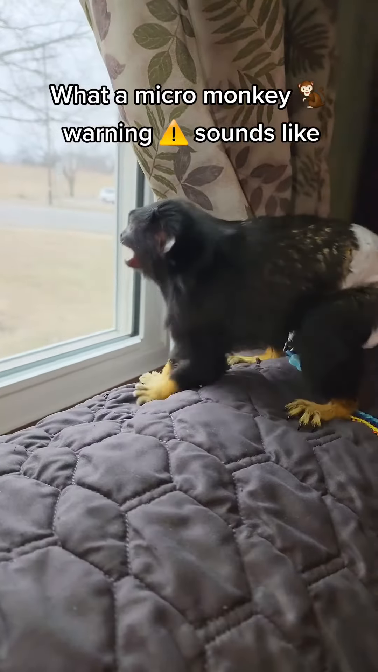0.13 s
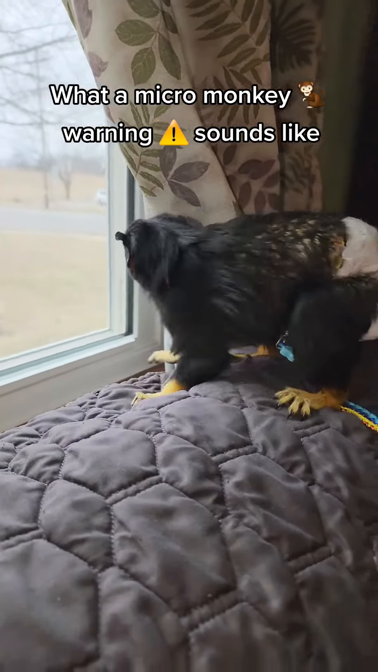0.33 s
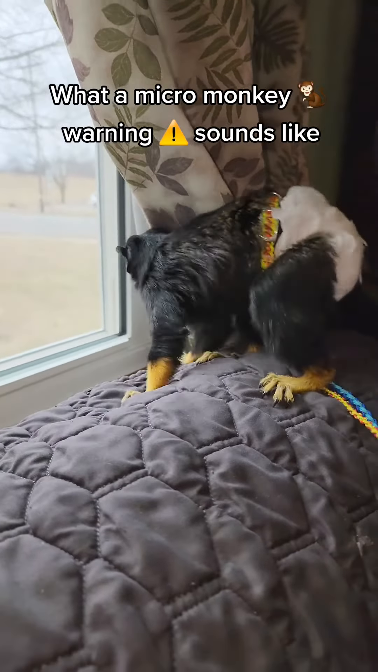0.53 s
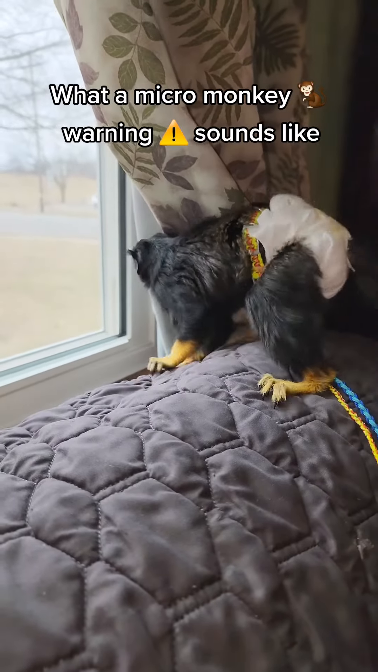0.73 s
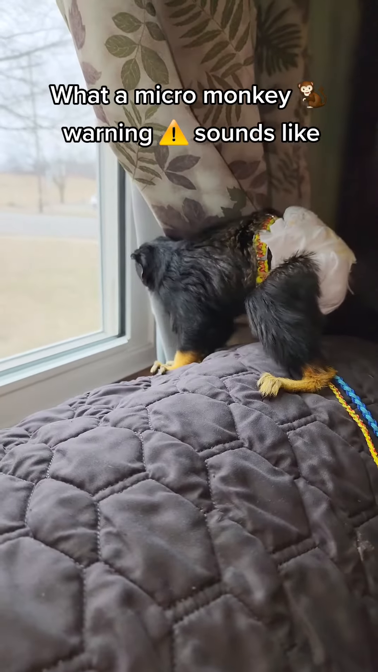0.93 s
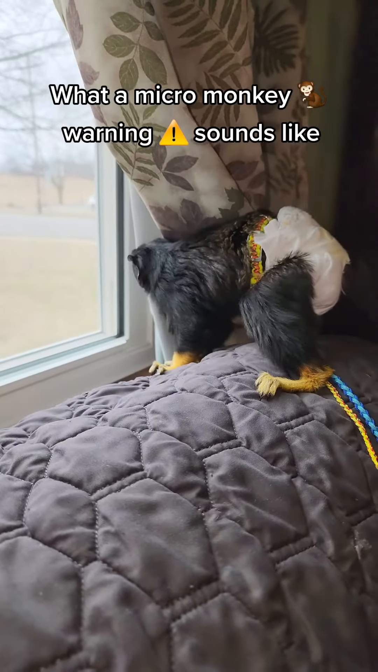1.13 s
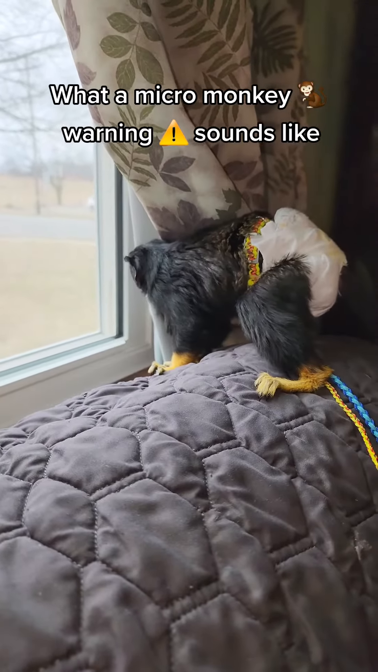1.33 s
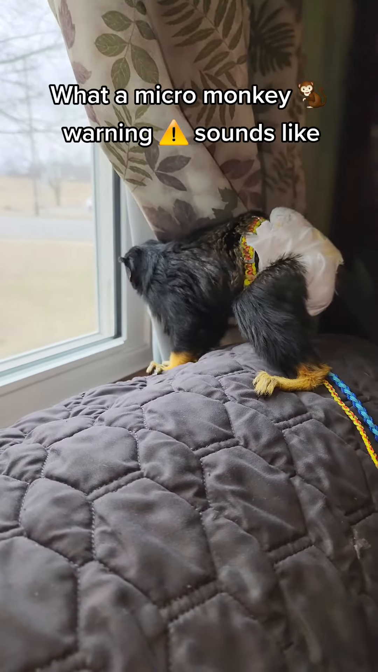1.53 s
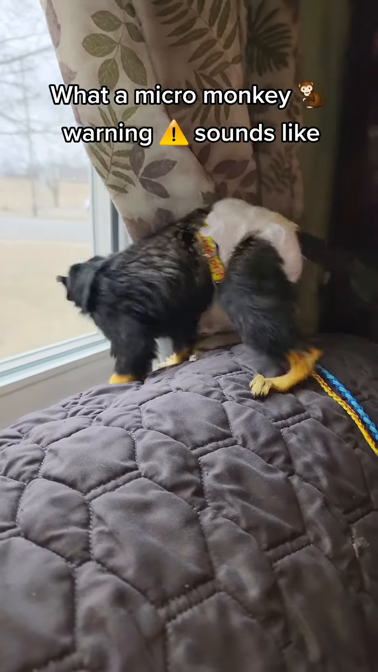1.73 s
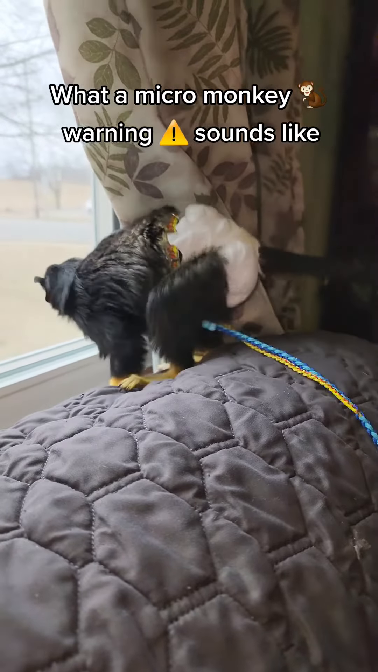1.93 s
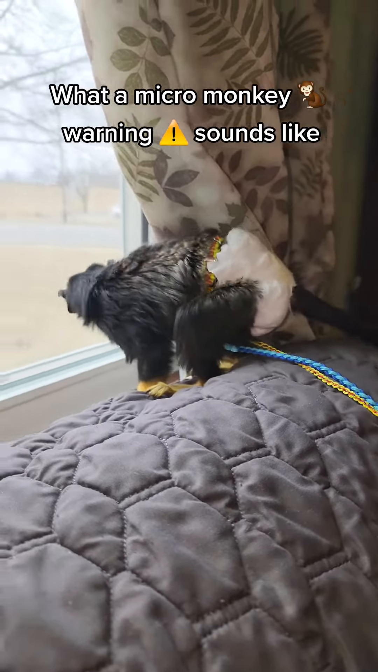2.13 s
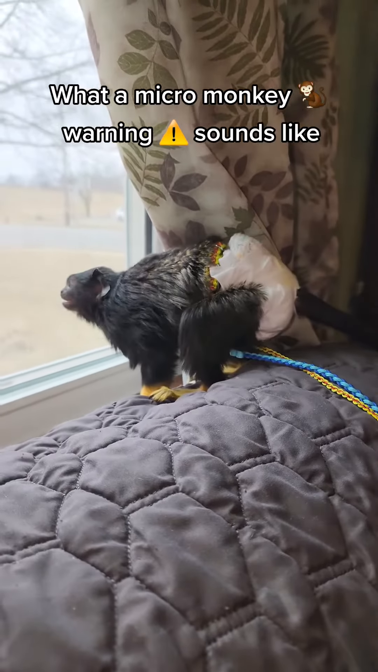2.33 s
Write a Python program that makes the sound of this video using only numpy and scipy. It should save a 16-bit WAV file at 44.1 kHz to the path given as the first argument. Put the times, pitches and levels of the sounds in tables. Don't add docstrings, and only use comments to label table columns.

```python
import sys
import numpy as np
from scipy import signal
from scipy.fft import rfft, irfft, next_fast_len
from scipy.io import wavfile
from scipy.ndimage import uniform_filter1d, minimum_filter1d, map_coordinates

SR = 44100
rng = np.random.default_rng(int(sys.argv[2]) if len(sys.argv) > 2 else 0)


def nominal_scale(level):
    x = np.asarray(level, float) / 20
    return 10 ** x


def int16_out(signal):
    q = np.round(np.clip(np.atleast_2d(signal).T, -1, 1) * 32767)
    wavfile.write(sys.argv[1], SR, q.astype(np.int16))


N = 110250
SHORT, LONG, PAD = SR // 20, SR // 5, SR // 8

# (frequency [Hz], level [dB per Hz])
AIR_COLOUR = [(88, -29), (150, 0.5), (300, -14.5), (500, -18), (700, -17), (1600, -25.5), (5000, -38.5),
              (9500, -50), (15700, -49)]
# (frequency [Hz], width [Hz], level [dB])
HUM_PEAKS = [(36.2, 14, 0), (66.6, 17, 1), (86.1, 21, -3), (121.6, 14, -4), (190, 13, -16.5),
             (283, 15, -14.5)]
# (frequency [Hz], correlation [-1 to 1])
PORT_LIKENESS = [(60, 1), (180, 0.94), (550, 0.28), (1650, -0.53), (4970, -0.12), (15000, -0.14)]
# (frequency [Hz], level [dB])
LEFT_LEAN = [(60, 0), (180, 1.5), (550, 2.5), (1650, 4.5), (4970, 2), (15000, 3)]
# (delay [s], left level [dB], right level [dB])
NEAR_WALLS = [(.0011, -13.5, -13), (.0068, -10.5, -12), (.0125, -20, -24), (.021, -28, -24.5),
              (.029, -18, -19)]
# (frequency [Hz], t60 [s])
ROOM_DECAY = [(300, .3), (2000, 0.23), (4000, 0.26), (8000, .225), (12000, 0.24), (16000, .11)]
# (time [s], peak level [dB], ring [Hz], t60 [s])
CLAW_TICKS = [(.0835, -44, 1950, 0.0098), (0.0838, -42, 4903, 0.018), (.8075, -63, 4800, .03),
              (.809, -61, 6100, 0.025), (.8315, -50.5, 6100, .015), (.8325, -62, 14800, 0.0071),
              (.786, -63, 1000, .08), (.945, -61, 3200, 0.036), (.168, -56, 7600, 0.026),
              (.995, -52, 517, 0.024), (1.015, -62, 9000, 0.0074), (1.055, -54, 1225, .04),
              (2.268, -44, 3770, 0.02), (2.268, -51, 8600, 0.0083), (2.268, -59, 13040, .006),
              (2.268, -45.5, 423, 0.047), (2.272, -47, 190, .07)]
SCUFF_TIMES = [.092, .184, .26, .62, .775, .805, .815, .87, .88, .9, 1.735, 1.8, 1.97, 2.14, 2.267, 2.268,
               2.275, 2.43, .83, .76, 1.012, 2.268, .128, .21, .106, .235, 1.937, 2.003]
# (length [s], peak level [dB], centre [Hz], width [octaves])
SCUFF_SOUNDS = [(.09, -75, 5600, 0.47), (0.016, -53, 6000, 0.92), (0.1, -73.5, 1192, 1.6),
                (0.263, -85, 1600, 3.4), (0.14, -71, 880, 0.52), (0.17, -78.5, 3200, 1.25),
                (0.071, -73.5, 2870, 0.13), (0.025, -69, 1400, 1.16), (0.24, -73, 460, 1.06),
                (0.18, -76.5, 1800, 1.6), (0.1237, -80.5, 12500, 0.23), (0.25, -74, 290, 1.47),
                (0.19, -75.5, 760, 1.8), (0.099, -75, 9830, 1.05), (0.085, -58, 240, 0.81),
                (0.07, -75, 2770, 0.78), (0.059, -73.5, 1510, 0.15), (0.042, -71, 510, 0.85),
                (.065, -72.5, 9500, 0.58), (.2, -78.5, 11000, 1.1), (0.0097, -73.5, 11000, 0.65),
                (0.013, -66.5, 1700, 1.5), (.025, -69.5, 6500, .45), (.016, -53, 7900, .12),
                (0.012, -60.5, 5400, .38), (0.1009, -66.5, 15000, .12), (0.049, -70, 12600, .1),
                (.1, -70.5, 13000, .2)]
# (time [s], length [s], start pitch [Hz], end pitch [Hz], peak level [dB])
CHIRP_NOTES = [(0.1073, .006, 5680, 4820, -32.5), (0.2248, 0.0082, 3614, 4010, -11),
               (0.2303, 0.01, 3976, 4763, -4.5), (0.2966, .0098, 3720, 3939, -8),
               (0.83, 0.015, 3000, 2640, -68), (1.027, 0.027, 2256, 2353, -44),
               (1.8767, 0.0039, 4926, 4380, -25), (1.935, .0105, 3800, 4527, -10.5),
               (2.001, 0.009, 3403, 3833, -12.5), (0.096, .017, 5000, 5170, -55.5),
               (0.223, 0.0041, 3347, 3755, -19)]
# (second [dB], third [dB], higher overtones [dB], left over right [dB], left port ahead [ms])
CHIRP_TIMBRES = [(-31, -48, -55, 6.5, 0.16), (3.5, -14.5, -54.5, 5, .135), (-10.5, -28.5, -58.5, -1, 0.15),
                 (-7, -20, -39.5, 10, .14), (5, 11, 3, 15, 0.14), (-18.5, -24, -30, 4.5, 0.14),
                 (-14.5, -38, -45, 6.5, 0.17), (-7, -38, -48.5, 8, 0.11), (-4.5, -31.5, -30, 8.5, 0.097),
                 (-30.5, -45, -55, 5.5, 0.12), (3, -21, -38.5, 3, .14)]
# (breath under whistle [dB], echoes [dB], glide power [exponent],
# fifth overtone over fourth [dB], share of the overtones' earliness [ratio])
CHIRP_AIMS = [(-30.5, 4, 1.1, -4, .4), (-41, -5, 1.4, -4, -0.017), (-41, -2.5, 1.1, -4, 1),
              (-43.5, -11, 0.45, -4, 1), (-5, -2, 0.37, 10, .7), (-45, -10, 1.2, -12, -0.53),
              (-27.5, 7, 1.4, -4, 0.7), (-38.5, -3, .8, -4, .9), (-37.5, -2.5, 0.41, -4, 0.83),
              (-13.5, -5, 1.3, -4, .3), (-37.5, -3.5, 0.55, -3.5, -.3)]
PARTIAL_SHIMMER = [.04, .07, .45, .3, .3]
# (frequency [Hz], gain [dB])
MOUTH_COLOUR = [(1000, 3), (3600, -2.5), (4500, -2), (7600, 0.75), (9000, 1.5), (12000, 0.08),
                (13300, -14.5), (15300, -9)]
# (frequency [Hz], level [dB])
BREATH_COLOUR = [(300, -30), (1500, -20.5), (3500, 1), (6000, 0.6), (8800, -2), (10400, -20), (13100, -11),
                 (16000, -18)]
# (frequency [Hz], gain [dB])
RIGHT_PORT_GAIN = [(2000, 4.17), (3700, -2), (4400, 2), (5200, -1.7), (7500, 4), (8500, -2), (11500, 3),
                   (15000, -2)]
# (frequency [Hz], turn [radians])
RIGHT_PORT_PHASE = [(3700, .05), (4400, .05), (7500, 0.046), (8500, .05), (11500, 0.24), (15000, 0.6033)]
# (time [s], length [s], peak level [dB], brightness [dB per octave])
SNIFF_PUFFS = [
    (0.434, 0.036, -69.5, 1),
    (0.528, 0.0244, -69, 2.5),
    (0.608, 0.024, -74.5, 1),
    (0.8, 0.015, -71, -7),
    (1.747, 0.042, -61.5, -2.5),
    (1.816, 0.055, -63.5, 5.5),
    (2.152, 0.021, -71.5, -2.5),
    (0.166, .016, -70.5, 4.5),
]
# (frequency [Hz], width [Hz], level [dB])
NOSE_PEAKS = [(2010, 350, -2), (3660, 816, -3), (4980, 600, 1.55), (7550, 1200, -4), (12514, 4000, -12)]
# (frequency [Hz], gain [dB])
PORT_COLOUR = [(100, 2.5), (8800, 3), (10100, -9), (11200, -4), (15500, -3)]


def unit(x):
    return x / np.sqrt(np.mean(x ** 2) + 1e-20)


def along(points, hz):
    f, v = np.transpose(points)
    return np.interp(np.log(hz + 1), np.log(f + 1), v)


def wobble(rate, size):
    knots = rng.standard_normal(size // 40)
    return map_coordinates(knots, [np.arange(size) * rate / SR])


def filtered(x, response):
    m = next_fast_len(x.shape[-1] + PAD)
    spectrum = rfft(x, m) * response(np.fft.rfftfreq(m, 1 / SR))
    return irfft(spectrum, m)[..., :x.shape[-1]]


def peaks(table, f):
    total = 0
    for k, (centre, width, db) in enumerate(table):
        resonance = 1j * f * width / (centre * centre - f * f + 1j * f * width)
        total = total + (-1) ** k * nominal_scale(db) * resonance
    return total


def hump(u, rise, fall):
    u, top = np.clip(u, 0, 1), rise / (rise + fall)
    return (u / top) ** rise * ((1 - u) / (1 - top)) ** fall


def add(into, x, s):
    part = into[..., round(s * SR):][..., :x.shape[-1]]
    part += x[..., :part.shape[-1]]


def echoes(x, wet_db):
    hz, t, z = signal.stft(rng.standard_normal((2, SR // 2)), SR, nperseg=256)
    decay = nominal_scale(-60 * t / along(ROOM_DECAY, hz)[:, None])
    tail = signal.istft(z * decay, SR, nperseg=256)[1]
    tail = tail * np.clip(np.arange(tail.shape[1]) / SR / 0.011, 0, 1)
    tail = tail / np.linalg.norm(tail[0]) * nominal_scale([[-12], [-11.5]])
    skews = rng.integers(0, 12, (len(NEAR_WALLS), 2))
    for (s, *side_db), skew in zip(NEAR_WALLS, skews):
        tail[[0, 1], round(s * SR) + skew] += nominal_scale(side_db)
    tail *= nominal_scale(wet_db)
    tail[:, 0] = 1
    return signal.fftconvolve(x, tail, axes=1)


def puff(length, rise, colour):
    left, right = rng.standard_normal((2, LONG))
    right = right + filtered(left - right, lambda hz: 1 / (1 + (hz / 1300) ** 2))
    noise = unit(filtered(np.array([left, right]), colour))
    grain_db = 2.2 * np.array([wobble(300, LONG), wobble(300, LONG)])
    swell_db = 2.2 * wobble(45, LONG)
    noise = noise * nominal_scale(grain_db + swell_db)
    return noise * hump(np.arange(LONG) / SR / length, rise, 0.94) * nominal_scale([[1.75], [-1.75]])


def port_pair(colour):
    def shares(hz):
        turn = np.arccos(np.clip(along(PORT_LIKENESS, hz), -1, 1)) / 2
        return colour(hz) * [np.cos(turn), np.sin(turn)]

    mid, side = filtered(rng.standard_normal((2, N)), shares)
    both = np.array([mid + side, mid - side])
    return unit(filtered(both, lambda hz: nominal_scale(along(LEFT_LEAN, hz) * np.array([[.5], [-.5]]))))


def room_tone():
    air = port_pair(lambda hz: nominal_scale(along(AIR_COLOUR, hz))) * nominal_scale(0.68 * wobble(4.7, N))
    hum = port_pair(lambda hz: abs(peaks(HUM_PEAKS, hz)) ** 0.98)
    return nominal_scale(-66) * air + nominal_scale(-53.5) * hum


def claw_ticks():
    out, t = np.zeros((2, N)), np.arange(SHORT) / SR
    for s, db, ring_hz, t60 in CLAW_TICKS:
        onset = 1 - np.exp(-t / 0.0011)
        ring = nominal_scale(db - 60 * t / t60) * np.sin(2 * np.pi * ring_hz * t) * onset
        right = .6 * np.roll(ring, shift=5)
        add(out, np.array([ring, right]), s)
    return out


def cloth_scuffs():
    out = np.zeros((2, N))
    for s, (length, db, centre_hz, width) in zip(SCUFF_TIMES, SCUFF_SOUNDS):
        def band(hz):
            octaves = np.log2(hz / centre_hz + 1e-6)
            return np.exp(-.5 * (octaves / width) ** 2)

        add(out, nominal_scale(db) * puff(length, 0.35, band), s)
    return out


def whistle(u, start_hz, end_hz, bow, overtones_db, soon):
    size, along_note = len(u), np.clip(u, 0, 1)
    bend = 1 - .004 * np.sin(np.pi * along_note) + 0.0054 * wobble(440, size)
    pitch_hz = (start_hz + (end_hz - start_hz) * along_note ** bow) * bend
    phase = 2 * np.pi * np.cumsum(pitch_hz) / SR
    note = np.zeros(size)
    for k, level_db in enumerate([0, *overtones_db]):
        flutter = nominal_scale(level_db - 0.56 * wobble(350, size))
        shimmer = 1 + PARTIAL_SHIMMER[k] * wobble(660, size)
        early = 0.43 * soon * (k > 0)
        audible = start_hz * (k + 1) < SR / 2.7
        swell = hump(u, 1.257 - early, 1.1 + early)
        note += flutter * shimmer * np.sin((k + 1) * phase) * audible * swell
    return note


def chirps():
    out = np.zeros((2, N))
    for note_row, timbre, aim in zip(CHIRP_NOTES, CHIRP_TIMBRES, CHIRP_AIMS):
        s, length, start_hz, end_hz, db = note_row
        two_db, three_db, high_db, pan_db, lead_ms = timbre
        breath_db, wet_db, bow, fifth_db, soon = aim
        u = np.arange(SHORT) / SR / length
        overtones_db = [two_db, three_db, high_db, high_db + fifth_db]
        note = whistle(u, start_hz, end_hz, bow, overtones_db, soon)
        breath = unit(filtered(rng.standard_normal(SHORT), lambda hz: nominal_scale(along(BREATH_COLOUR, hz))))
        note = filtered(note, lambda hz: nominal_scale(along(MOUTH_COLOUR, hz)))
        note = note + nominal_scale(breath_db) * breath * hump(u, 1.257, 1.1)

        def far_port(hz):
            lag = -2j * np.pi * hz * lead_ms / 1000
            return nominal_scale(along(RIGHT_PORT_GAIN, hz)) * np.exp(lag + 1j * along(RIGHT_PORT_PHASE, hz))

        right = filtered(note, far_port)
        pair = np.array([note * nominal_scale(pan_db / 2), right * nominal_scale(-pan_db / 2)])
        add(out, echoes(nominal_scale(db) * pair, wet_db), s)
    return out


def sniffs():
    out = np.zeros((2, N))
    for s, length, db, tilt_db in SNIFF_PUFFS:
        def nose(hz):
            return peaks(NOSE_PEAKS, hz) ** 2 * nominal_scale(tilt_db * np.log2(hz / 5000 + 0.0057))

        add(out, nominal_scale(db) * puff(length, 2.1, nose), s)
    return out


def scene():
    fidgets = claw_ticks() + cloth_scuffs() + sniffs()
    fidgets = filtered(fidgets, lambda hz: nominal_scale(along(PORT_COLOUR, hz)))
    return room_tone() + chirps() + echoes(fidgets, wet_db=-2)[:, :N]


def top_cut(x):
    return signal.sosfilt(signal.butter(12, 16100, fs=SR, output="sos"), x)


def record(dry):
    need = np.minimum(1, 0.91 / (abs(dry).max(0) + 1e-9))
    gain = uniform_filter1d(minimum_filter1d(need, size=265), size=131)
    mix = filtered(dry * gain, lambda hz: hz < 15800)
    return top_cut(mix)


dry = scene()
out = record(dry)
int16_out(out)
```